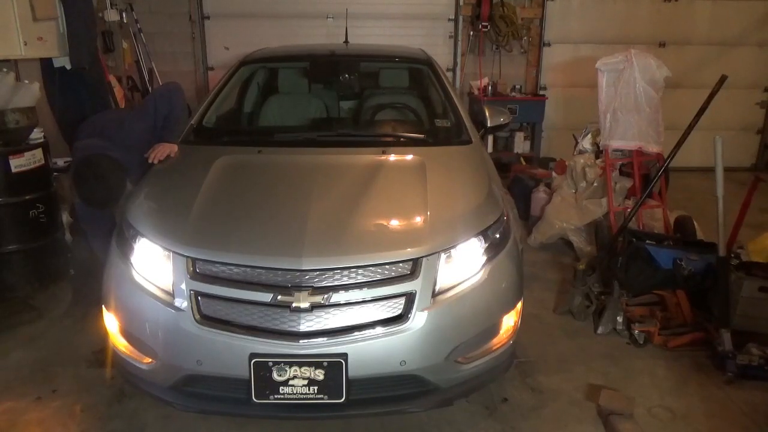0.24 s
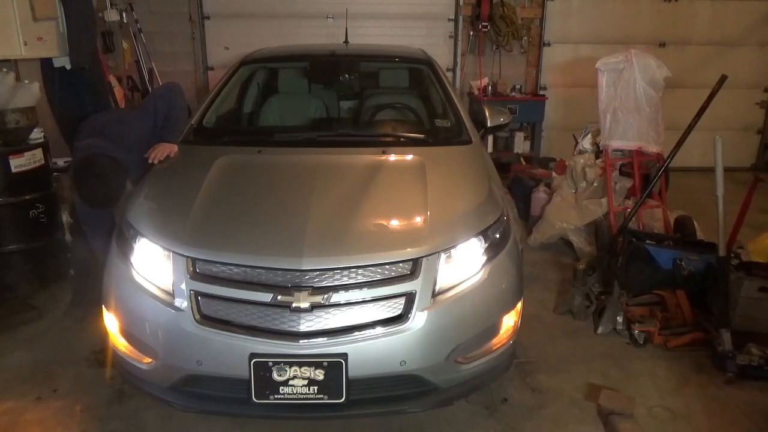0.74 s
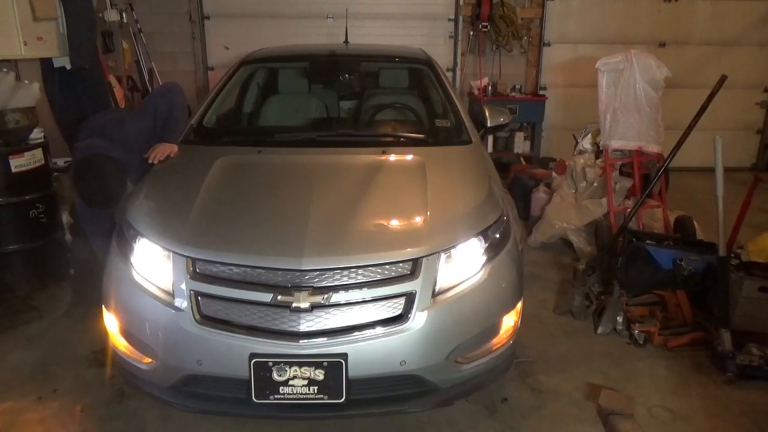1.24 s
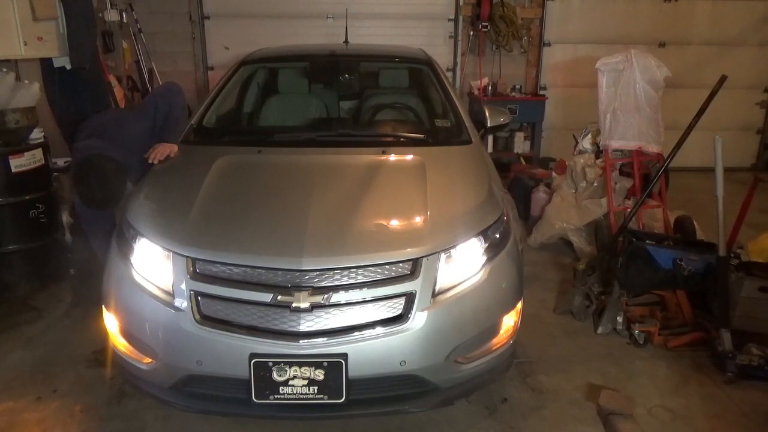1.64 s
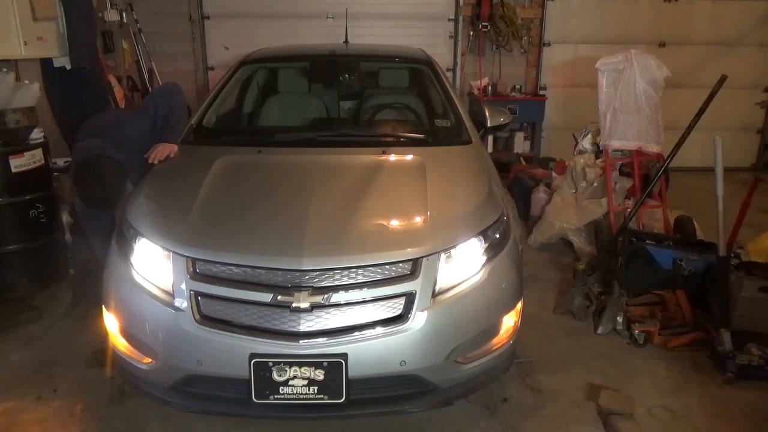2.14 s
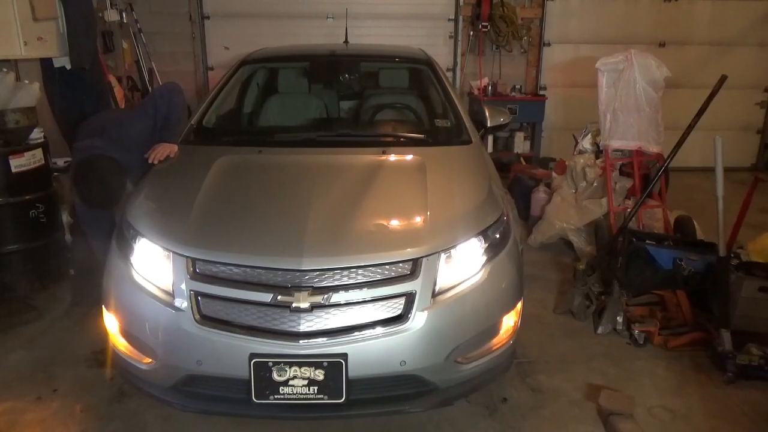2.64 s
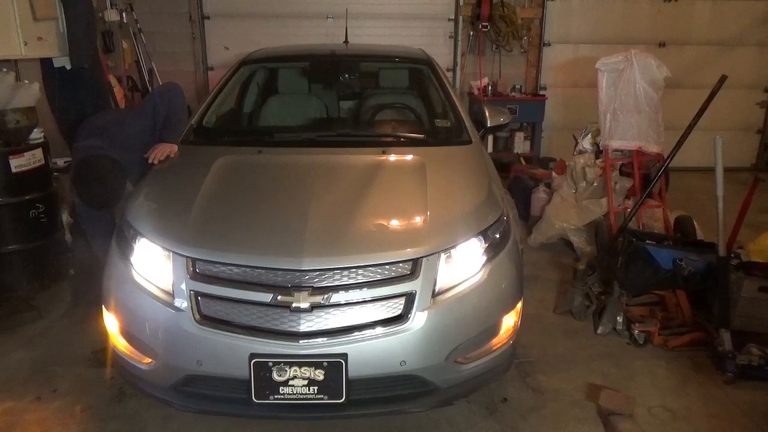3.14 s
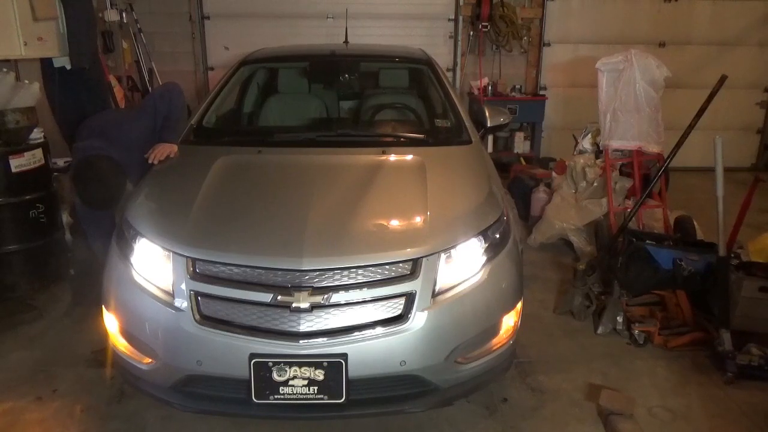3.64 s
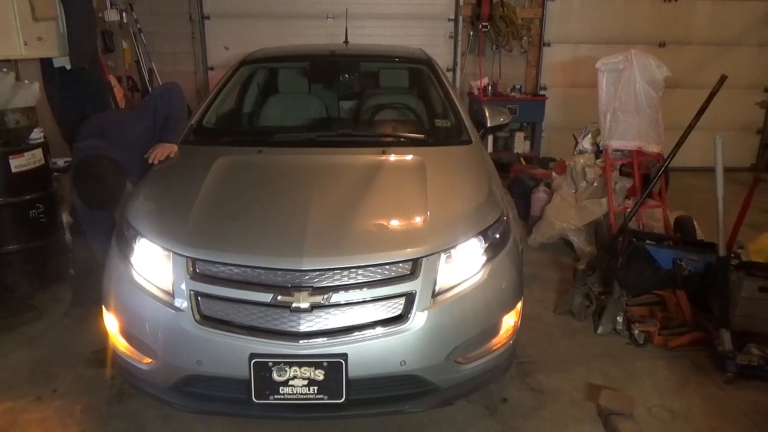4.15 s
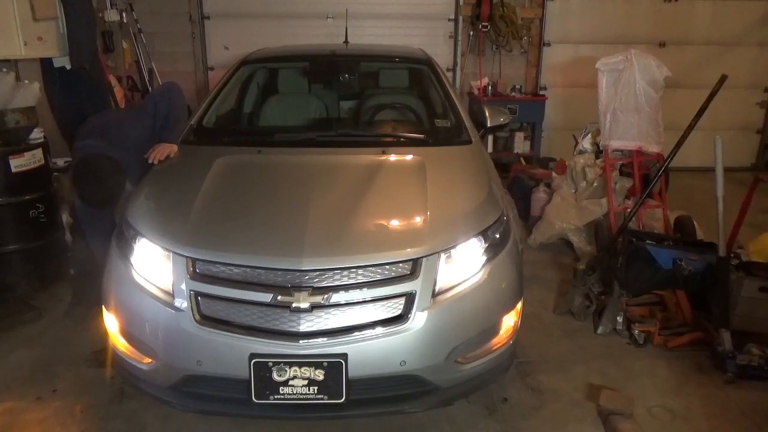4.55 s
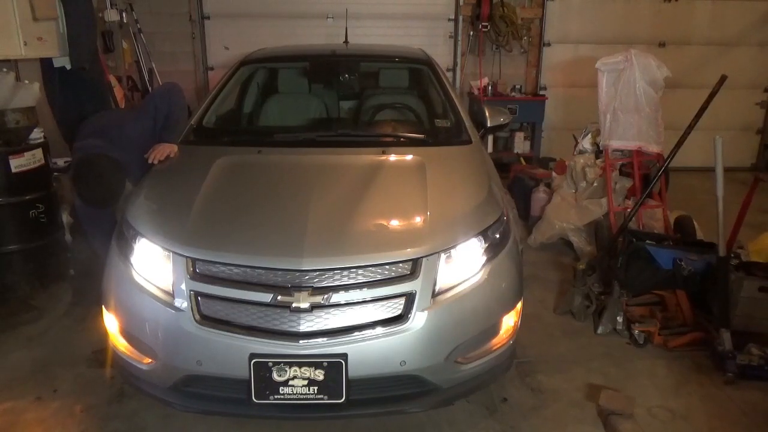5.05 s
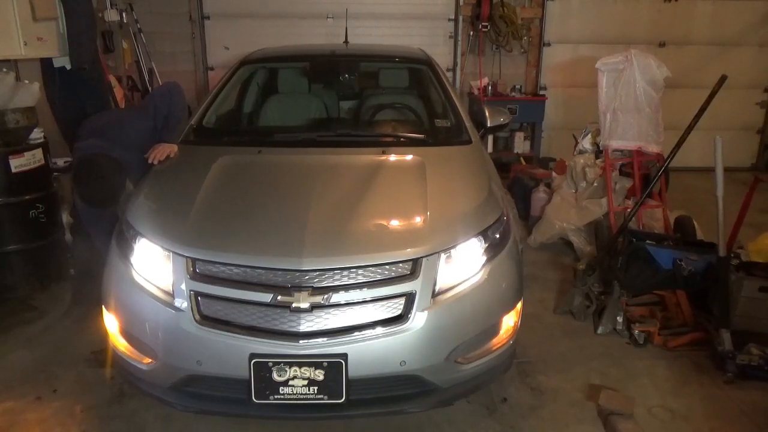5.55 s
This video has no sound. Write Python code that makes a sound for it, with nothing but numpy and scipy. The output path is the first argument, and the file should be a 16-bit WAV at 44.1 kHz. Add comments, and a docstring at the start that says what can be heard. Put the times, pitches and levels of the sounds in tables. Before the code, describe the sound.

From 0 seconds, a steady jet of air hisses from a car tyre valve through a chuck, already under way. It is broad, bright noise, strongest around 4 to 7 kHz, with a thin shrill edge near 11 kHz and little bass. The flow trembles slightly, with a brief swell at 0.8 seconds and a tiny dip at 1.8. Far beneath is a very quiet, wavering motor hum with low rumble. At about 4.15 the tone begins to shift and dips a little. Breathy, fluttering bursts then slip past the seal at about 4.3, 4.6, 5.0, 5.25, 5.5 and 5.7, the first two strongest, each with a blurred whistle around 5 kHz. The colour keeps changing as the person leans, middle frequencies thinning while the shrill top flickers. The hiss continues to the end near 5.8 seconds. Close garage echoes and a slightly wide stereo tail surround it.

```python
"""In a closed garage, air escapes from a car tyre through a chuck pressed on the valve, behind the wing.
The jet is shaped noise: a broad hiss with a shrill top. Car, floor and walls colour it with echoes.
Late on the hand shifts: bursts of noise slip past the seal, and the echoes change as the body leans.
A small motor in the car hums underneath, made of sine tones over low noise."""
import sys
import numpy as np
from scipy import signal
from scipy.fft import rfft, irfft, next_fast_len
from scipy.io import wavfile
from scipy.ndimage import uniform_filter1d

SR = 44100
rng = np.random.default_rng(int(sys.argv[2]) if len(sys.argv) > 2 else 0)


def dump_mix(stems):
    """Bounce the given channels to the path in sys.argv[1] as a 16-bit WAV at rate SR."""
    frames = np.atleast_2d(stems).T  # one column per channel
    limited = np.clip(frames, -1, 1)  # hard clip at full scale
    pcm = np.round(limited * 32767).astype(np.int16)
    wavfile.write(sys.argv[1], SR, pcm)


N = 254898
T = np.arange(N) / SR
LEFT_RIGHT = np.array([[1], [-1]])  # sign of a left-minus-right difference in each channel


def undb(db):
    """Turn decibels into an amplitude factor."""
    return 10 ** (np.asarray(db) / 20)


def unit(x):
    """Scale a sound to rms 1."""
    return x / np.sqrt(np.mean(x ** 2))


def along(table, hz):
    """Read (frequency, value) rows on a log-frequency axis."""
    f, value = np.transpose(table)
    return np.interp(np.log(hz + 1), np.log(f), value)


def noise(colour, channels=1):
    """Gaussian noise with a given spectrum, rms 1."""
    white = rfft(rng.standard_normal((channels, N)))
    shape = undb(along(colour, np.fft.rfftfreq(N, 1 / SR)))
    return unit(irfft(white * shape, N))


def walk(rate):
    """Slow random wobble: levels held for 1 / rate seconds, then smoothed twice; spread near 1."""
    k = int(SR / rate)
    steps = np.repeat(rng.standard_normal(N // k + 1), k)
    return 1.37 * uniform_filter1d(uniform_filter1d(steps, k), k)[:N]


LEAK_ATTACK_S, LEAK_RELEASE_S = 0.075, 0.13
GAP_WIDTH_HZ, GAP_LEAD_S = 700, 0.045  # the gap whistles before the broad leak opens
BODY_DB, SHRILL_DB = -28.5, -35  # base rms levels of the jet, before its changes and the echoes
JET_RISE_DB = 0.5  # the jet is this much louder from the first leak on
CHANGE_S, CHANGE_TOP = 0.035, 0.89  # half-length of a level change; its share in the shrill top

# spectrum of the broad hiss: (frequency [Hz], relative level [dB per Hz])
JET_COLOUR = [(150, -47), (350, -36), (480, -24), (570, -12.5), (780, -10.5), (950, -11.5), (1090, -5.5),
              (1350, -7.5), (2080, -7), (3200, -6), (4050, -1.5), (4300, 2), (5500, 0), (6800, 1.4),
              (7300, -4), (8400, -9), (9800, -3.5), (12700, -17)]
# spectrum of the shrill top: (frequency [Hz], relative level [dB per Hz])
SHRILL_COLOUR = [(8500, -23), (9500, -8.5), (10200, 2.5), (10600, 7.5), (10950, 10.5), (12000, 0)]
# change of the shrill top's level as the hand shifts: (time [s], level [dB])
SHRILL_LATE = [(4.1, 5.5), (4.28, 6.5), (4.45, 3.5), (4.7, 4.5), (5.05, 6), (5.25, -1), (5.4, 4.5),
               (5.62, 7), (5.78, 8.5)]
# brief swells (+) and dips (-) in the hiss level: (time [s], level [dB])
LEVEL_CHANGES = [(0.84, 2.2), (1.82, -0.91), (4.14, -1.5), (5.2, 0.2), (5.5, -0.82), (5.77, -0.19)]


def jet():
    """Turbulent hiss whose flow trembles a little; the shrill top from the valve core flickers more."""
    change = sum(db * np.exp(-((T - s) / CHANGE_S) ** 2) for s, db in LEVEL_CHANGES)
    first_leak = LEAKS[0][0]
    rise_db = JET_RISE_DB * np.interp(T, [first_leak, first_leak + LEAK_ATTACK_S], [0, 1])
    flow = 0.55 * walk(14)
    body = undb(BODY_DB + change + flow) * noise(JET_COLOUR)
    top_db = SHRILL_DB + np.interp(T, *np.transpose(SHRILL_LATE))
    top_db = top_db + CHANGE_TOP * change + 1.3 * flow + 0.75 * walk(19)
    top = undb(top_db) * noise(SHRILL_COLOUR)
    return undb(rise_db) * (body + top)


def leak_shapes(lead_s):
    """Each leak swells, holds and dies away between 0 and 1; lead_s makes it start earlier."""
    shapes = []
    for s, hold, *_ in LEAKS:
        corners = np.cumsum([s - lead_s, LEAK_ATTACK_S, hold + lead_s, LEAK_RELEASE_S])
        shapes.append(np.interp(T, corners, [0, 1, 1, 0]))
    return np.array(shapes)


# spectrum of the upper part of the leak: (frequency [Hz], relative level [dB per Hz])
SEAL_COLOUR = [(2000, -31), (3000, -2), (3600, 3.5), (4200, 2), (5000, 0.5), (6300, 4), (7000, -6),
               (8000, -9)]
# spectrum of its low part: (frequency [Hz], relative level [dB per Hz])
SEAL_LOW_COLOUR = [(100, -26), (250, -10.5), (600, -4.5), (1200, -0.5), (2000, 1), (2800, 0), (4000, -12)]
# air slipping past the seal, levels before mixing: (start [s], hold [s], level [dB],
# low part relative to it [dB], resonance of the gap [Hz], resonance relative to the level [dB])
LEAKS = [(4.33, 0.14, -27, -10, 5270, -3.5), (4.62, 0.24, -29, -11.5, 5220, -3),
         (4.96, 0.14, -33, -15, 5386, -7), (5.24, 0.13, -31, -11, 5790, -8),
         (5.5, 0.1, -30.5, -8.5, 5100, -3.5), (5.68, 0.17, -31.5, -5, 5320, -9)]


def seal():
    """A duller leak that flutters as the rubber seal lifts; the gap lends it a moving resonance."""
    s, hold, level_db, low_db, gap_hz, gap_db = np.transpose(LEAKS)
    # overlapping leaks add in power
    high, low = (np.sqrt(undb(2 * db) @ leak_shapes(0)) for db in (level_db, level_db + low_db))
    ring = np.sqrt(undb(2 * (level_db + gap_db)) @ leak_shapes(GAP_LEAD_S))
    hz = np.interp(T, s + LEAK_ATTACK_S + hold / 2, gap_hz)
    # slow noise carried on the moving centre makes a breathy band around it
    lowpass = signal.butter(2, GAP_WIDTH_HZ / 2, fs=SR, output="sos")
    slow = signal.sosfilt(lowpass, rng.standard_normal((2, N)))
    turn = 2 * np.pi * np.cumsum(hz) / SR
    whistle = ring * unit(slow[0] * np.cos(turn) + slow[1] * np.sin(turn))
    upper_part = (high * noise(SEAL_COLOUR) + whistle) / np.sqrt(2)
    low_part = undb(1.4 * walk(7)) * low * noise(SEAL_LOW_COLOUR)
    return undb(0.79 * walk(20)) * (upper_part + low_part)


NEAR_T60_S, FAR_T60_S = 0.35, 1.1  # time for the echoes to fall by 60 dB
LEFT_LAG_US = 24  # the left port hears the air this many microseconds later

# tail off the far walls, heard as a difference between the ports: (frequency [Hz], level [dB])
FAR = [(100, -11), (500, -9.5), (2000, -8), (4000, -9), (6300, -7.5), (8000, -19.5), (11000, -8.5)]
# left minus right balance of the ports: (frequency [Hz], level [dB])
PORT_BALANCE = [(60, -1), (110, -4), (190, 2), (350, -4), (630, -0.2), (1120, -1.2), (2020, -1.3),
                (3620, -2), (6510, -1.2), (11700, 0)]


def garage(x, standing, near_db):
    """Direct sound, standing waves and the tail off the walls, picked up by two close ports."""
    size = next_fast_len(len(x) + SR // 2)
    hz, t = np.fft.rfftfreq(size, 1 / SR), np.arange(SR // 2) / SR
    # near surfaces reach both ports alike, far walls ring longer and differ between them
    fades = [unit(undb(-60 * t / t60)) for t60 in (NEAR_T60_S, FAR_T60_S)]
    near, far = rfft(rng.standard_normal((2, len(t))) * fades, size) / np.sqrt(len(t))
    front = (1 + undb(near_db) * near) / np.sqrt(1 + undb(2 * near_db))
    path = front + LEFT_RIGHT * undb(along(FAR, hz)) * far
    lift_db = sum(db / (1 + (2 * (hz - f) / w) ** 2) for f, w, db in standing)
    balance = undb(LEFT_RIGHT * along(PORT_BALANCE, hz) / 2)
    lag = np.exp(-1j * np.pi * LEFT_RIGHT * hz * LEFT_LAG_US / 10 ** 6)
    return irfft(rfft(x, size) * path * undb(lift_db) * balance * lag, size)


# the body beside the wheel starts to move; every stance it passes through has its own echo paths
MOVES_S, STANCE_S, STANCES = 4.15, 0.2, 10  # start, spacing and number of stances
NEAR_DB, NEAR_MOVING_DB = -9, -6  # near echoes relative to the direct sound: first stance, later ones
SHADE_HZ, SHADE_WIDTH_HZ = 2685, 730  # the leaning body hides these mids more and more
SHADE_FROM_S, SHADE_DB_PER_S = 4.96, -6
UPPER_HZ, UPPER_WIDTH_HZ = 8000, 3800
LEANING_PAN_DB = -0.5  # added left minus right balance while the body leans

# standing waves between wheel arch, floor and walls, first stance:
# (frequency [Hz], width [Hz], lift or dip [dB])
STANDING = [(624, 20, 4.5), (678, 20, -5.5), (775, 20, 4.5), (775, 120, 3), (818, 20, -4.5), (851, 20, 4.0),
            (969, 20, -6.0), (1001, 20, 7.0), (1034, 20, -6.0), (1066, 20, 4.0), (1095, 170, 6.5),
            (1141, 20, -9.0), (1195, 20, 3.0), (1270, 20, -8.0), (1324, 20, -4.0), (1357, 20, 7.5),
            (1464, 20, 5.0), (1497, 20, -6.0), (1540, 20, 4.5), (1604, 35, 7.0), (1658, 20, 7.5),
            (1733, 35, -4.0), (1863, 20, 4.5), (1906, 35, 5.5), (2046, 35, -6.0), (2326, 35, 7.5),
            (2476, 60, 5.5), (2562, 20, -5.5), (2616, 20, 8.0), (2735, 20, 8.0), (3047, 35, 7.0),
            (3112, 35, -4.5), (3295, 20, 4.5), (3456, 20, 4.5), (3510, 35, 7.5), (3553, 20, 5.0),
            (3628, 35, -5.0), (3801, 20, 9.0), (3844, 20, -5.0), (4113, 20, -7.0), (4177, 35, -7.0),
            (4221, 20, 4.0), (4274, 20, 4.5), (4436, 20, 3.0), (4511, 60, 5.5), (4608, 35, -9.5),
            (4651, 20, 5.0), (4759, 20, -4.0), (4802, 20, 4.0), (4823, 35, 6.0), (4942, 20, 5.5),
            (4996, 35, -9.0), (5039, 20, -3.0), (5071, 20, 3.0), (5136, 35, 7.5), (5179, 20, -4.5),
            (5200, 35, 9.5), (5286, 20, -5.5), (5319, 20, 7.5), (5362, 20, -5.0), (5437, 20, 6.0),
            (5534, 35, -10.0), (5652, 35, 7.0), (5857, 35, 10.0), (5932, 20, -4.5), (5975, 35, 3.0),
            (6019, 20, 6.0), (6040, 20, 3.0), (6105, 60, -2.5), (6191, 20, 4.5), (6212, 35, 8.0),
            (6255, 20, 4.5), (6298, 20, -4.5), (6460, 20, 3.0), (6525, 20, 4.5), (6578, 20, -7.0),
            (6686, 20, 4.5), (6697, 20, 4.5), (6783, 20, 4.0), (6858, 20, -5.0), (6934, 20, 6.0),
            (6955, 20, -4.5), (6998, 20, 4.0), (7052, 100, 5.0), (7192, 20, 4.0), (7375, 35, -9.5),
            (7429, 35, 4.0), (7547, 35, 4.5), (7720, 20, 8.0), (7860, 35, -5.0), (8010, 60, 7.0),
            (8193, 35, 6.0), (8441, 35, 7.5), (8850, 35, 7.0), (9087, 20, 9.0), (9432, 35, -6.0),
            (9550, 20, -6.0), (9711, 20, 4.0), (9765, 20, -7.0), (9798, 20, 6.0), (9851, 20, 4.5),
            (9895, 20, -5.0), (9927, 35, -7.5), (10024, 20, 5.0), (10185, 20, -5.5), (10282, 35, 6.0),
            (10454, 20, -4.5), (10519, 20, -4.5), (10541, 20, 7.0), (10594, 20, 7.5), (10627, 20, 3.0),
            (10659, 20, 5.0), (10767, 35, -7.0), (10885, 20, 5.0), (10917, 20, -4.0), (10939, 20, 5.5),
            (10971, 20, 8.0)]
# standing waves that come and go as the body leans:
# (frequency [Hz], width [Hz], lift or dip [dB], strongest at [s], half-length [s])
LEANING = [(1100, 90, 6, 4.45, 0.2), (1080, 90, 3, 5, 0.3), (1500, 120, 4, 4.72, 0.12),
           (2900, 82, 5, 4.48, 0.15), (2750, 95, -6, 4.4, 0.38), (2670, 72, 4, 4.7, 0.25),
           (5230, 55, 7, 4.4, 0.16), (5220, 55, 7, 4.82, 0.16), (4980, 80, 6, 4.75, 0.16),
           (6150, 80, 6, 4.5, 0.12), (6150, 80, 5, 4.73, 0.12), (4500, 80, 5, 4.45, 0.12),
           (2000, 110, 6, 4.93, 0.14), (4680, 80, -4, 4.5, 0.22), (6620, 60, 8, 4.8, 0.3),
           (6890, 180, -6, 4.6, 0.4), (7105, 110, 3, 5.15, 0.25), (10930, 120, 8, 4.8, 0.54),
           (5490, 80, 8, 5.06, 0.14), (5030, 100, 5, 5.14, 0.12), (5900, 400, -4, 5.1, 0.12),
           (4350, 100, 4, 4.85, 0.12), (10400, 120, -5, 4.8, 0.25), (2380, 120, -4, 5.35, 0.22),
           (4000, 120, 5, 5.27, 0.12), (4020, 120, 5, 5.6, 0.12), (5770, 100, 7, 5.48, 0.14),
           (6150, 250, 4, 5.4, 0.12), (1750, 100, 7, 5.73, 0.14), (4500, 400, -5, 5.75, 0.12),
           (5300, 160, 5, 5.66, 0.14), (5000, 200, 3, 5.6, 0.12), (4550, 400, -3, 5.2, 0.25)]
# lift or dip of the upper hiss once the body moves: (time [s], level [dB])
UPPER = [(4.15, -4), (4.35, -4), (4.55, -0.5), (4.75, -3), (4.95, 0), (5.15, 0), (5.35, -0.5), (5.5, -1.5),
         (5.65, -2), (5.78, -3.5)]


def air_among_stances(air):
    """Pass the air through changing echo paths, as the leaning body alters its surroundings."""
    out = np.zeros((2, N))
    s = MOVES_S + STANCE_S * np.arange(STANCES)  # moment at which each stance is full
    shade_db = SHADE_DB_PER_S * np.maximum(s - SHADE_FROM_S, 0)
    upper_db = np.interp(s, *np.transpose(UPPER))
    for k, share in enumerate(np.eye(STANCES)):
        # one stance fades into the next at even power
        weight = np.sqrt(np.interp(T, s, share))
        a, b = np.flatnonzero(weight)[[0, -1]]
        standing, near_db, pan_db = STANDING, NEAR_DB, 0
        if k > 0:
            standing = [(f, w, db * np.exp(-((s[k] - at) / half) ** 2)) for f, w, db, at, half in LEANING]
            standing.append((SHADE_HZ, SHADE_WIDTH_HZ, shade_db[k]))
            standing.append((UPPER_HZ, UPPER_WIDTH_HZ, upper_db[k]))
            near_db, pan_db = NEAR_MOVING_DB, LEANING_PAN_DB
        heard = garage((air * weight)[a:b], standing, near_db)[:, :N - a]
        out[:, a:a + heard.shape[1]] += heard * undb(LEFT_RIGHT * pan_db / 2)
    return out


MOTOR_HZ = 67.3  # mean shaft rate
RUMBLE_DB = -59  # level of the low garage rumble

# motor tones, levels before they waver: (multiple of the shaft rate, rms level [dB])
MOTOR = [(1, -65.5), (3, -63.5), (6, -69.5)]
# other hums of fixed pitch, levels before they waver: (frequency [Hz], rms level [dB])
HUMS = [(216, -74), (284, -73.5), (428, -74)]
# spectrum of the garage rumble: (frequency [Hz], relative level [dB per Hz])
RUMBLE_COLOUR = [(15, -41.5), (25, -22.5), (40, -20), (59, -0.5), (79, -11.5), (108, -2), (141, -3.5),
                 (195, 3), (328, -4.5), (400, -2), (520, -5.5), (880, -120)]


def motor():
    """Multiples of the shaft rate that waver in speed and strength, with fixed hums and low rumble."""
    turn = 2 * np.pi * np.cumsum(MOTOR_HZ * (1 + 0.00388 * walk(2.87))) / SR
    tones = np.zeros(N)
    for k, db in MOTOR:
        level = undb(db + 0.64 * walk(12) + 2.2 * walk(5.41))
        tones += np.sqrt(2) * level * np.sin(k * turn)
    for hz, db in HUMS:
        tones += np.sqrt(2) * undb(db + 1.8 * walk(7.4)) * np.sin(2 * np.pi * hz * T)
    mid, side = noise(RUMBLE_COLOUR, channels=2)
    return tones + undb(RUMBLE_DB) * (mid + 0.3 * side * LEFT_RIGHT)


def scene():
    """Jet and leak share the garage's echoes; the motor joins without them."""
    air = (jet() + seal())[0]
    return air_among_stances(air) + motor()


TOP_HZ = 11020


def record(dry):
    """The camera cuts steeply above its top frequency."""
    lowpass = signal.ellip(18, .3, 90, TOP_HZ, fs=SR, output="sos")
    return signal.sosfilt(lowpass, dry)


dry = scene()
out = record(dry)
dump_mix(out)
```